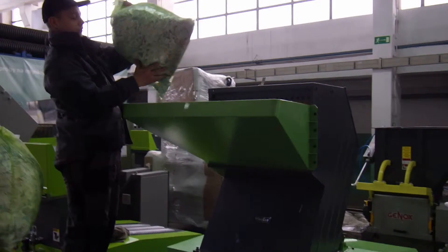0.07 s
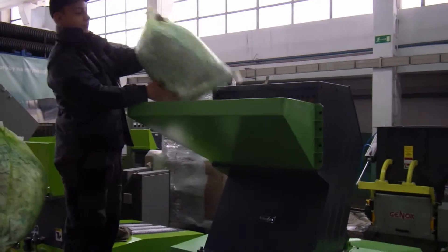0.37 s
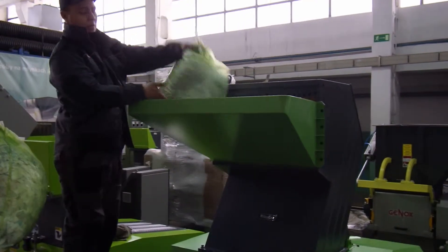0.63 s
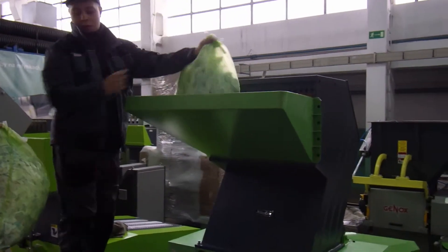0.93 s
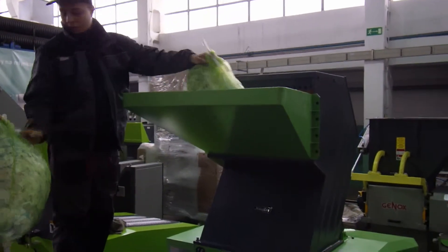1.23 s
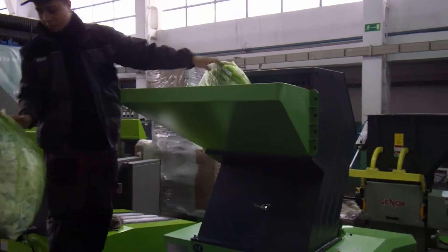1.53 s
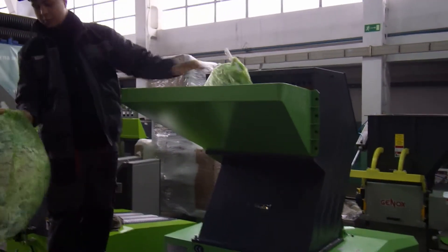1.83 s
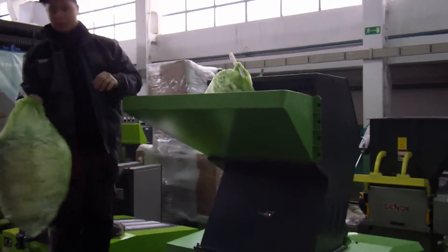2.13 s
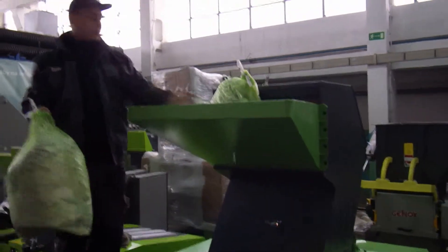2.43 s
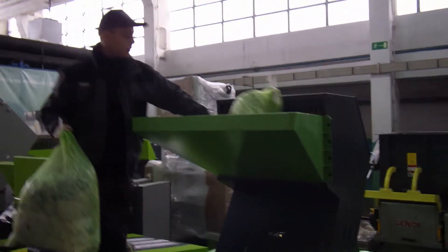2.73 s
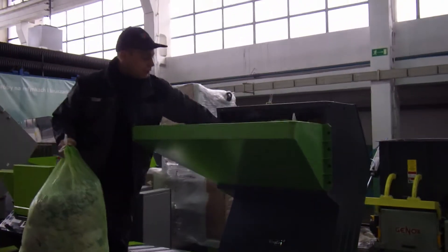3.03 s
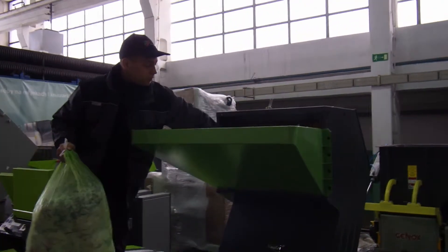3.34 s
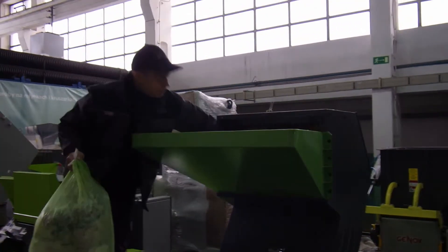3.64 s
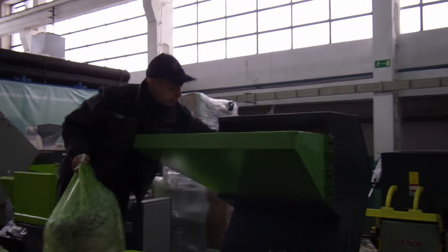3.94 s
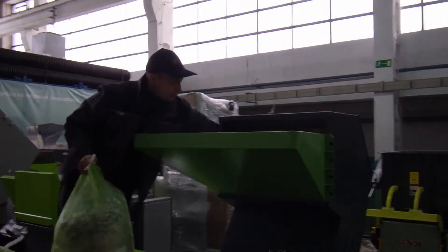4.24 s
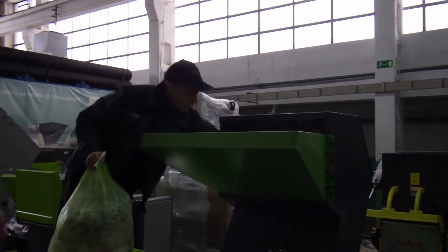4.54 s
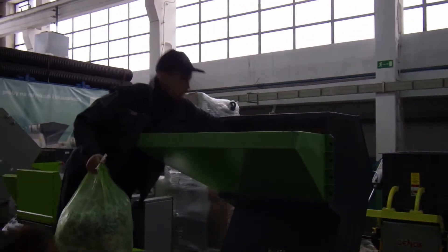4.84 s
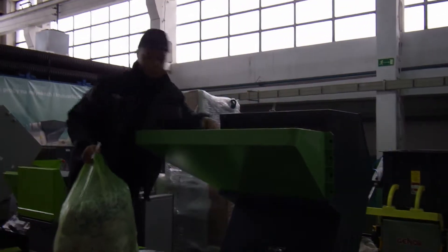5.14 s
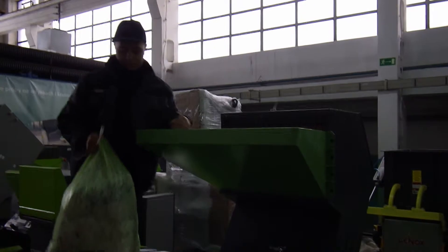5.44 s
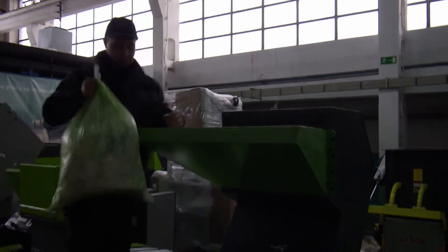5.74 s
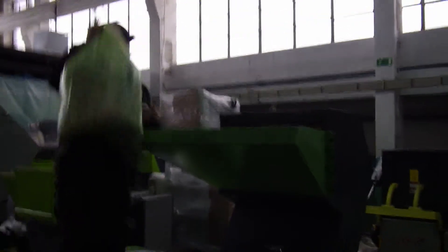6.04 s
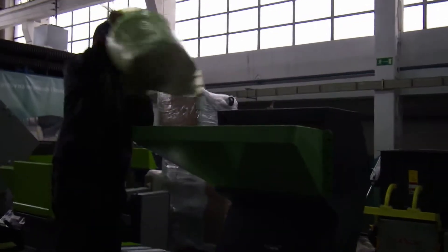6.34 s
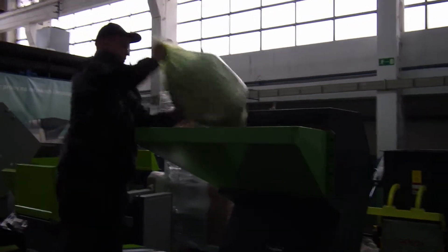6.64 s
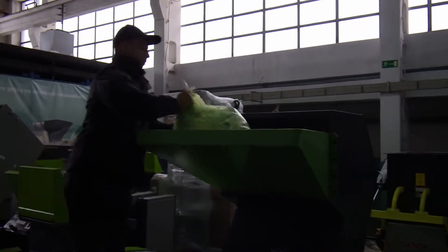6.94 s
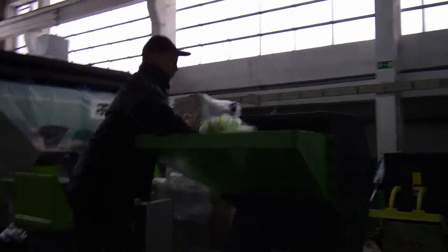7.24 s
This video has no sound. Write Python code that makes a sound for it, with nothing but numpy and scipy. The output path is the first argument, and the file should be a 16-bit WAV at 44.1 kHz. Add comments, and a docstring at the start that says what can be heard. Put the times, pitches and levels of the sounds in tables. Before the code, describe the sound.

A large plastic grinding mill runs without pause in a factory hall. Its rotor gives a loud, siren-like drone with a fast throb, while knives chop scrap in a rapid clatter against the ringing steel housing. A thin whine flares once early on, and wads of plastic crunch briefly now and then. A low hum and hall rumble lie underneath, with two faint ticks and a soft bump later.

```python
"""A factory hall, where a plastics grinding mill chews scrap pushed into its hopper.
The rotor turns about 25 times a second: it pumps air like a siren, droning on its 21st order with a
throb once a turn. Its knives chop scrap against the steel housing, which rings. Drives hum, a thin
whine flares once and the hall rumbles. Now and then a wad of plastic crunches; two ticks and a soft
bump sound faintly."""
import sys
import numpy as np
from scipy import signal
from scipy.fft import rfft, irfft, next_fast_len
from scipy.io import wavfile

SR = 44100
rng = np.random.default_rng(int(sys.argv[2]) if len(sys.argv) > 2 else 0)


def to_wav(s):
    """Save 16-bit WAV."""
    ch = np.atleast_2d(s).T  # columns
    pcm = np.round(np.clip(ch, -1, 1) * 32767)  # PCM
    wavfile.write(sys.argv[1], SR, pcm.astype(np.int16))


N = 321048
TIME = np.arange(N) / SR
FFT_SIZE = next_fast_len(N + SR // 2)   # room for ringing
FREQS = np.fft.rfftfreq(FFT_SIZE, 1 / SR) + 1e-3
DRONE_ORDER = 21

# Knife cuts in one turn. Each row: position in turns, then strength in dB in the chamber,
# the housing, the side panel and the clatter.
CUTS = [(.0, 2, -7.5, -20, -1), (.31, 3.5, -2, 10.5, 2.5), (0.428, 6, -5.5, 3, 1), (.54, -2, -1.5, 3, 5),
        (.71, -15.5, 0, 4.5, 0), (.83, 1.5, -0.5, -4, 5.5)]


def from_db(db):
    """Decibels to gain."""
    return 10 ** (np.asarray(db) / 20)


def unit_rms(x):
    """Scale to unit power."""
    return x / np.sqrt(np.mean(x ** 2) + 1e-20)


def curve(rows):
    """Interpolate (seconds, value) rows at every sample."""
    return np.interp(TIME, *np.transpose(rows))


def bell(offset, half_width):
    """Gaussian, peak 1."""
    return np.exp(-(offset / half_width) ** 2)


def drift(rate_hz):
    """Smooth random motion, rms 1."""
    step, settle = 40, 2000
    pole = np.exp(-2 * np.pi * step * rate_hz / SR)
    noise = rng.standard_normal(N // step + settle + 2)
    slow = signal.lfilter([1], [1, -2 * pole, pole * pole], noise)[settle:]
    return np.interp(np.arange(N) / step, np.arange(len(slow)), unit_rms(slow))


def filtered(x, response):
    """Apply a frequency response."""
    return irfft(rfft(x, FFT_SIZE) * response, FFT_SIZE)[:N]


def shaped(x, response, level_db):
    """Filter, normalise, then apply a level."""
    return from_db(level_db) * unit_rms(filtered(x, response))


def colour(points):
    """Response through (Hz, dB) points, falling 92 dB per octave outside them."""
    hz, db = np.transpose(points)
    octaves_outside = np.abs(np.log2(FREQS / np.clip(FREQS, hz[0], hz[-1])))
    return from_db(np.interp(np.log(FREQS), np.log(hz), db) - 92 * octaves_outside)


def resonance(hz, width_hz):
    """Response of one mode, peak 1."""
    return 1 / (1 + 1j * (FREQS ** 2 - hz ** 2) / (FREQS * width_hz))


def tone(cycles, waver_db, wander_cycles, rate_hz):
    """A sine whose level and phase waver in the hall's echoes; rms about 1."""
    amplitude = np.sqrt(2) * from_db(waver_db * drift(rate_hz))
    return amplitude * np.cos(2 * np.pi * (cycles + wander_cycles * drift(rate_hz)))


def drone(turns):
    """The rotor pumps air like a siren, choking and cresting once a turn; the hopper resonates above it."""
    # Each row: time in seconds, level in dB.
    levels = [(0.0, -21), (0.81, -21), (0.83, -25), (1.01, -21.5), (1.74, -19.5), (2.45, -23.5),
              (2.49, -19.5), (2.66, -23), (2.84, -19.5), (3.0, -22.5), (3.18, -17.5), (3.38, -20.5),
              (4.07, -19), (4.14, -21), (4.66, -22), (4.74, -20), (6.91, -21.5), (7.28, -22)]
    choke_db = -9 * bell((turns - .48 + .5) % 1 - .5, .16)   # at 0.48 turn
    crest_db = 2.35 * bell((turns - .85 + .5) % 1 - .5, .094)   # at 0.85 turn
    siren = tone(DRONE_ORDER * turns, waver_db=.8, wander_cycles=.014, rate_hz=10)
    hopper = resonance(558, 210) * colour([(450, 0), (630, 0)])
    return shaped(from_db(choke_db + crest_db) * siren, hopper, curve(levels))


def rotor_tones(turns):
    """Uneven knives add weaker orders, which crest roughly together late in the turn."""
    # Each row: multiple of the turning rate, level in dB.
    orders = [(18, -50.5), (24, -41.5), (26, -43), (27, -51), (31, -53), (32, -47), (37, -45.5), (38, -47),
              (39, -43.5), (40, -39), (41, -35), (42, -37), (43, -52.5), (45, -57), (46, -59), (58, -51),
              (61, -48.5), (63, -48), (89, -56)]
    # Each row: time in seconds, common gain in dB.
    gains = [(0.0, 0), (1.0, -2.3), (2.4, 0), (3.15, 3), (3.9, -1.5), (4.45, .8), (5.6, 1), (7.28, -3.5)]
    since_crest = turns - .74
    phases = rng.normal(0, .12, len(orders))
    tones = sum(from_db(db) * tone(order * since_crest + phase, waver_db=2, wander_cycles=.043, rate_hz=2.05)
                for (order, db), phase in zip(orders, phases))
    return tones * from_db(curve(gains) - .4)


def chopping(turns, strengths_db, decay_s, bed_db, uneven_db, grain_db, memory):
    """Each cut is a burst of fractures over a bed of tumbling scrap; each turn partly repeats the last."""
    blur_s = .0016   # hall echoes soften each onset
    turn_samples = round(N / turns[-1])
    fresh = rng.standard_normal((N // turn_samples + 20, turn_samples))
    fractures = signal.lfilter([1], [1, -memory], fresh, axis=0).ravel()[-N:]
    power = from_db(bed_db) ** 2
    for (position, *_), db in zip(CUTS, strengths_db):
        count, since_cut = np.divmod(turns - position + 1, 1)
        age_s = since_cut * turn_samples / SR
        bite = from_db(db + uneven_db * rng.standard_normal(256))[count.astype(int)]
        power = power + bite ** 2 * np.exp(-age_s / decay_s) * (1 - np.exp(-age_s / blur_s))
    return unit_rms(fractures * np.sqrt(power) * from_db(grain_db * drift(320)))


def grinding(turns, sag_hz, swell):
    """The cuts sound through the chamber's air, the steel housing and the flakes flung against it."""
    # Four spectra. Each row: frequency in Hz, relative level in dB.
    chamber_spectrum = [(400, -66.5), (450, -64), (490, -47.5), (520, -48), (560, -52), (620, -57.5),
                        (700, -59.5), (790, -58), (870, -58.5), (950, -59.5), (1010, -54.5), (1080, -55.5),
                        (1150, -65.5)]
    housing_spectrum = [(1200, -67), (1350, -67.5), (1480, -70.5), (1560, -64), (1650, -70.5),
                        (1780, -69.5), (1950, -62), (2150, -64.5), (2350, -67.5), (2480, -62.5),
                        (2620, -66), (2760, -71), (2890, -64), (3050, -76.5)]
    clatter_spectrum = [(3300, -84.5), (3480, -86.5), (3620, -77), (3850, -79), (4250, -72.5), (4570, -65),
                        (4900, -74), (5400, -86.5), (5950, -86.5), (6300, -91.5), (6700, -83.5),
                        (7400, -93.5)]
    hiss_spectrum = [(7700, -91), (8500, -92.5), (9500, -96), (10500, -94), (12000, -103.2),
                     (13400, -109.3), (15000, -106.2), (15700, -114.2)]
    # Steel plate modes. Each row: frequency in Hz, width in Hz, gain in dB.
    plate_modes = [(1400, 10, -0.5), (1575, 28, 5.5), (1855, 21, 5.5), (1960, 12, 4.5), (2050, 16, -0.5),
                   (2141, 37, 6), (2445, 13, 3), (2576, 27, 4), (2890, 19, 3.5), (3600, 30, 6),
                   (4650, 140, 2), (5320, 61, 7), (5970, 90, 5.5), (6600, 80, 4.5)]
    # Scrap reaching the knives. Each row: time in seconds, gain in dB.
    feed_gains = [(0.0, 0.7), (1.5, -0.5), (1.85, -1.1), (2.55, .2), (3.25, -0.3), (3.85, -0.5),
                  (4.1, 0.05), (5.4, -0.1), (6.4, 0.3), (7.08, 0.6), (7.28, -2.5)]

    _, chamber_db, housing_db, panel_db, clatter_db = np.transpose(CUTS)
    hiss_db = (panel_db + clatter_db) / 2
    thuds = chopping(turns, chamber_db, decay_s=.0071, bed_db=-3.5, uneven_db=2.5, grain_db=2.5, memory=.24)
    knocks = chopping(turns, housing_db, decay_s=.0039, bed_db=-5.5, uneven_db=1.7, grain_db=0, memory=.38)
    raps = chopping(turns, panel_db, decay_s=.003, bed_db=-12, uneven_db=1.6, grain_db=.5, memory=.5)
    cracks = chopping(turns, clatter_db, decay_s=.0045, bed_db=-4, uneven_db=2, grain_db=.6, memory=.42)
    shreds = chopping(turns, hiss_db, decay_s=.007, bed_db=13, uneven_db=5.5, grain_db=-.1, memory=.1)

    plates = 1 + sum((from_db(db) - 1) * resonance(hz, width_hz) for hz, width_hz, db in plate_modes)
    bright_db = .4 * sag_hz   # load slows the rotor and lifts the treble
    chamber = shaped(thuds, colour(chamber_spectrum), -29.5)
    housing = shaped(knocks, colour(housing_spectrum) * plates, -32)
    panel = shaped(raps, resonance(2456, 37) * resonance(2456, 130), -44.5 + 7.5 * swell)
    clatter = shaped(cracks, colour(clatter_spectrum) * plates, -39 + bright_db)
    hiss = shaped(shreds, colour(hiss_spectrum), -57.3 + bright_db)

    # Scrap tumbles unevenly: the paths flutter together and separately.
    flutter_hz, shared_db, own_db = 7.6, .43, .57
    feed = from_db(curve(feed_gains) + shared_db * drift(flutter_hz))
    paths = (chamber, housing, panel, clatter, hiss)
    return feed * sum(path * from_db(own_db * drift(flutter_hz)) for path in paths)


def hum(swell):
    """A low hum that rises with the swell and stays up."""
    level = from_db(-63.5 + 9 * swell)
    return level * tone(255.6 * TIME, waver_db=2.5, wander_cycles=.065, rate_hz=5.8)


def whine():
    """A thin whine, faint throughout, flares once."""
    flare_s, half_width_s = 1.45, .29
    level = from_db(-56) + from_db(-44.5) * bell(TIME - flare_s, half_width_s)
    return level * tone(2306 * TIME, waver_db=4.5, wander_cycles=.08, rate_hz=3.8)


def drives():
    """The drives hum at steady pitches."""
    # Each row: frequency in Hz, level in dB.
    partials = [(208, -66), (232, -68), (298.5, -69.5)]
    return sum(from_db(db) * tone(hz * TIME, waver_db=3, wander_cycles=.063, rate_hz=2.2)
               for hz, db in partials)


def hall_rumble():
    """Steady low noise of the hall."""
    # Each row: frequency in Hz, relative level in dB.
    spectrum = [(25, -91), (45, -91), (70, -85), (120, -83), (200, -83), (300, -82), (370, -76)]
    return shaped(rng.standard_normal(N), colour(spectrum), -55)


def crunches():
    """A wad caught by the knives tears in a short shower of tiny snaps."""
    # Each row: centre in seconds, half width in seconds, level in dB.
    wads = [(0.536, 0.023, -32.5), (1.508, 0.029, -31.5), (1.55, 0.019, -35.5), (4.127, 0.1, -37),
            (6.98, 0.04, -35)]
    # Each row: frequency in Hz, relative level in dB.
    spectrum = [(700, -24), (1400, -0.5), (2600, 4.5), (3400, -14), (4600, 3.5), (5600, -14), (8500, -20.5),
                (11000, -31), (15000, -41)]
    snaps_per_s = 3000
    level = sum(from_db(db) * bell(TIME - centre_s, half_s) for centre_s, half_s, db in wads)
    snaps = (rng.random(N) < snaps_per_s / SR) * rng.standard_normal(N)
    return level * unit_rms(filtered(snaps, colour(spectrum)))


def ticks():
    """Two sharp bursts of bright noise."""
    # Each row: start in seconds, level in dB before filtering.
    bursts = [(3.566, -47), (7.106, -49)]
    envelope = sum(from_db(db) * (TIME > start_s) * np.exp(-np.abs(TIME - start_s) / .002)
                   for start_s, db in bursts)
    return filtered(envelope * rng.standard_normal(N), resonance(13000, 5000) ** 2)


def bump():
    """One soft bump: a heavily damped low sine."""
    start_s, decay_s, pitch_hz = 5.945, .012, 48
    age_s = np.maximum(TIME - start_s, 0)
    return from_db(-43) * np.exp(-age_s / decay_s) * np.sin(2 * np.pi * pitch_hz * age_s)


def scene():
    """One rotor times the drone, tones and cuts; the other sounds lie around it."""
    # Drone pitch, sagging under load. Each row: time in seconds, frequency in Hz.
    pitches = [(0.0, 522.71), (0.5, 521.79), (1.0, 522.08), (1.6, 522.38), (2.2, 522.92), (3.0, 522.8),
               (3.6, 523.0), (4.2, 523.17), (5.0, 522.71), (5.6, 522.81), (6.2, 523.43), (6.8, 523.68),
               (7.28, 523.53)]
    pitch_hz = curve(pitches)
    sag_hz = 522.8 - pitch_hz
    turns = np.cumsum(pitch_hz) / SR / DRONE_ORDER
    swell_start_s, swell_length_s = 1.5, 1.04   # hum and side panel rise together
    swell = np.clip((TIME - swell_start_s) / swell_length_s, 0, 1)
    mill = drone(turns) + rotor_tones(turns) + grinding(turns, sag_hz, swell)
    background = hum(swell) + whine() + drives() + hall_rumble()
    return (mill + background + crunches() + ticks() + bump())[None]


def record(dry):
    """The microphone has narrow dips in the treble; the top is cut steeply."""
    # Each row: frequency in Hz, width in Hz.
    mic_dips = [(3185, 90), (4075, 130), (5130, 405), (5670, 380), (7130, 260), (8170, 45)]
    cutoff_hz = 15750
    notches = np.prod([1 - resonance(hz, width_hz) for hz, width_hz in mic_dips], axis=0)
    lowpass = 1 / np.sqrt(1 + (FREQS / cutoff_hz) ** 300)
    return filtered(dry[0], notches * lowpass)[None]


dry = scene()
out = record(dry)
to_wav(out)
```